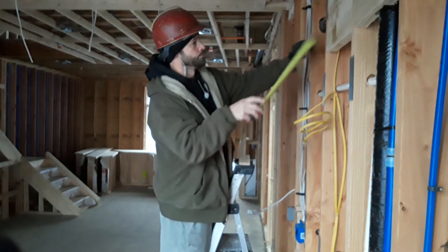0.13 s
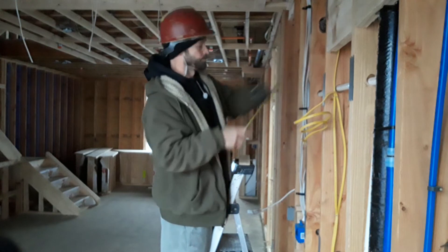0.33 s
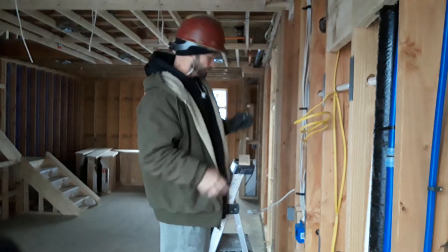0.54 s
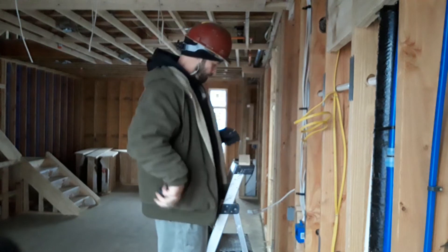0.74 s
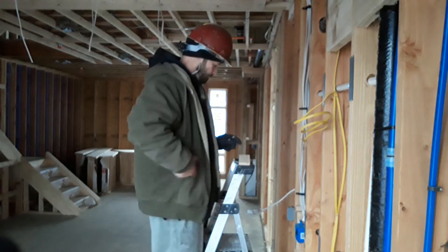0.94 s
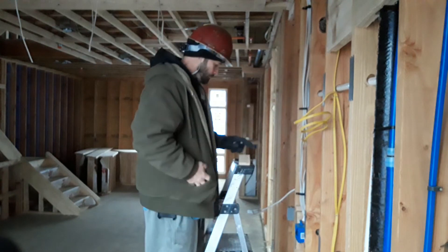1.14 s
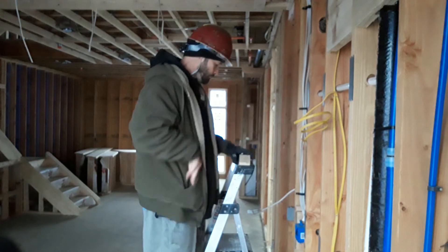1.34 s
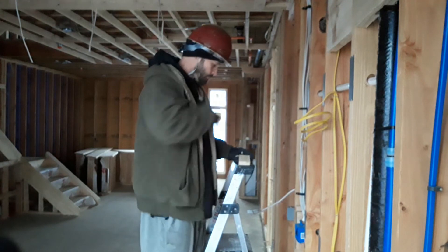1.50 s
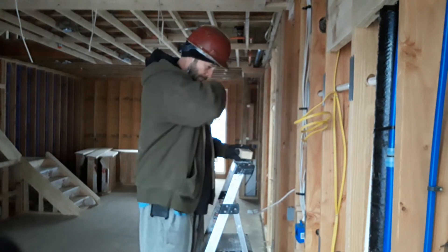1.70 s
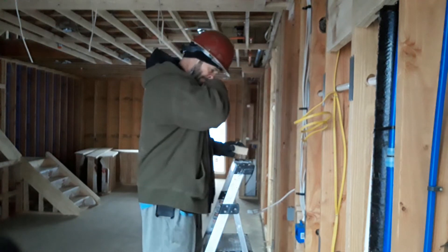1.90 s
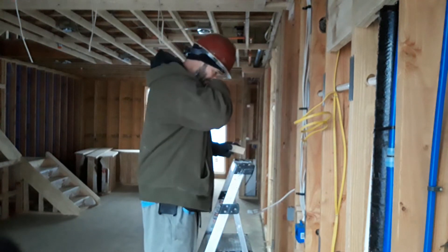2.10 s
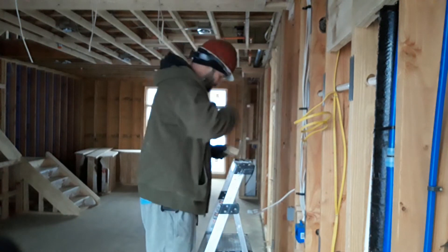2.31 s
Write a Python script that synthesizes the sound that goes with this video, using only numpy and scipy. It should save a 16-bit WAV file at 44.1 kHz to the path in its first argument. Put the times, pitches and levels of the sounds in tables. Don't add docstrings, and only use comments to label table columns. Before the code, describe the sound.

A steel tape measure retracts: gritty scraping starts near 0.05 s, stutters, then speeds up with blade slaps around 0.25 and 0.32 s, and a very loud, sharp snap at 0.49 s rings briefly through a bare timber hall. Quiet knocks come at 1.3-1.4, 1.6, 2.04 and faintly 2.3 s, with soft jacket rustle from 1.3 to 2 s. A distant generator drones low throughout; close stereo, muted treble.

```python
import sys
import numpy as np
from scipy import signal
from scipy.fft import rfft, irfft
from scipy.io import wavfile
from scipy.ndimage import uniform_filter1d

SR = 44100
rng = np.random.default_rng(int(sys.argv[2]) if len(sys.argv) > 2 else 0)


def output_pcm(signal):
    pcm = np.clip(np.atleast_2d(signal).T, -1, 1) * 32767
    wavfile.write(sys.argv[1], SR, np.round(pcm).astype(np.int16))


def decibels_to_gain(level_db):
    exponent = np.asarray(level_db, float) / 20
    return 10 ** exponent


N = 103635
T = np.arange(N) / SR

# (time [s], level [dB])
SCRAPE_LEVEL = [
    (.04, -63.5),
    (.075, -42),
    (.125, -58),
    (.15, -39.5),
    (.22, -35),
    (.29, -39),
    (.33, -34),
    (.39, -39),
    (.484, -41),
]
# (frequency [Hz], gain [dB])
SCRAPE_TONE = [(250, -38), (500, -16), (1000, -16), (2300, -5.5), (3000, 2.5), (5000, -3.5), (7000, 0),
               (15000, 0.5)]
# (frequency [Hz], width [Hz], level [dB])
BLADE_MODES = [(2280, 350, -9), (3500, 350, -11), (5370, 690, 12), (7200, 520, 5)]
# (frequency [Hz], gain [dB])
SNAP_COLOUR = [(150, -47.5), (300, -15), (500, -7), (1500, -9), (2200, -2.5), (4000, -0.5), (6500, -1.5),
               (15000, -7.5)]
# (frequency [Hz], level [dB], decay t60 [s])
CASE_MODES = [(790, -9.5, 0.024), (2240, 1.5, 0.01), (2663, -4, 0.057), (3336, -5, 0.0067),
              (5310, -10, .015), (6630, -8.5, .015)]
# (time [s], peak [dB], pitch [Hz], width [Hz], length [s])
KNOCK_EVENTS = [(0.056, -37.5, 3800, 5290, 0.013), (0.101, -27.5, 900, 1000, 0.0032),
                (0.147, -35, 5320, 6000, 0.0068), (0.2471, -15, 4670, 3570, .009),
                (.2475, -22.5, 2080, 3050, 0.014), (0.324, -26, 2344, 2040, 0.022),
                (1.273, -45, 834, 700, .004), (1.355, -39.5, 253, 200, 0.025),
                (1.412, -37.5, 201, 200, 0.012), (1.589, -35, 4170, 5080, 0.0021),
                (1.5895, -37.5, 1100, 1400, .003), (1.5926, -31, 2400, 1500, 0.0027),
                (1.812, -46.5, 5800, 3530, 0.016), (2.037, -30.5, 753, 980, 0.0058),
                (2.047, -39.5, 2660, 610, .008), (2.293, -48.5, 4220, 4500, 0.0047)]
# (start [s], rise [s], fall [s], level [dB], brightness [dB per octave])
CLOTH_STROKES = [
    (1.26, .03, 0.13, -63.5, 4.5),
    (1.33, 0.047, 0.053, -64, -6),
    (1.6, 0.024, .1, -61, 3),
    (1.8, 0.13, 0.18, -58.5, 2),
    (1.92, .16, 0.072, -52, 0),
]
# (frequency [Hz], gain [dB])
CLOTH_TONE = [(500, -31.5), (1500, -4), (3000, -2.5), (4500, -8), (5300, -1.5), (7000, -1), (10000, -2),
              (15000, -7.5)]
# (frequency [Hz], decay t60 [s])
HALL_DECAY = [(350, 0.57), (700, 0.64), (1400, 0.51), (2800, 0.44), (5600, 0.34), (11000, 0.28)]
# (frequency [Hz], left minus right before
# scaling [dB])
PORT_BALANCE = [(300, -4), (700, -1.5), (1300, 5.5), (2300, 5.5), (4400, 0), (7000, -5.5), (10000, -7.5),
                (15000, -1.5)]
# (time [s], level [dB])
DRONE_LEVEL = [(0.0, -43), (0.34, -38.5), (0.44, -39), (0.69, -44.5), (1.02, -49), (1.8, -45),
               (1.98, -41.5), (2.35, -42.5)]
# (order of the cycle [multiple], level [dB])
GENERATOR_ORDERS = [(9, -13), (10, -2.5), (12, -3.5), (14, -10), (15, -3), (18, -12), (20, -9), (31, -16.5)]
# (frequency [Hz], gain [dB])
AIR_TONE = [(25, -34.5), (127, -6), (270, -15.5), (476, -19), (1840, -27.5), (2900, -31), (3800, -39),
            (15000, -49.5)]
# (frequency [Hz], likeness [0-1])
AIR_LIKENESS = [(60, 0.96), (130, 0.6), (290, 0.1), (640, 0.05)]
# (frequency [Hz], gain [dB])
MIC_TONE = [(3000, 1), (7100, 0.5), (7900, -10.5), (8700, -21), (10400, -9), (13000, -14.5), (15200, -9),
            (16000, -14)]

BLADE_DB, SCRAPE_DB = -11, 0
GRIT_PER_S, GRIT_SPREAD_DB = 9500, 2.5
SNAP_S, SNAP_DB, SNAP_RING_DB = .4853, 2.5, -15.5
RATTLE_S, RATTLE_DB = .012, -2.5
CONTACT_DB = 10
KNOCK_WET_DB = -7.5
ZIP_HZ, ZIP_WIDTH_HZ, ZIP_DB = 4910, 90, 11.5
HALL_DB, HALL_BUILD_S = 3.5, 0.001
PORT_LAG_S = .00044
GENERATOR_HZ, WAVER, ORDER_SWAY_DB = 13.0, 0.0018, 1.5
AIR_DB, FLICKER_DB = -1.5, -0.5
TOP_HZ, BOTTOM_HZ = 16000, 45
CEILING = 1.7


def curve(table, x, log=False):
    a = np.array(table, float)
    if log:
        return np.interp(np.log(x + 1), np.log(a[:, 0] + 1), a[:, 1])
    return np.interp(x, a[:, 0], a[:, 1])


def unit(x):
    return x / np.sqrt(np.mean(x ** 2))


def colour(x, table, share=1, tilt_db=0):
    size = 4096
    hz = np.arange(size // 2 + 1) * SR / size
    gain_db = share * curve(table, hz, True) + tilt_db * np.log2(hz / 4000 + .1)
    cepstrum = irfft(gain_db * np.log(10) / 20)
    cepstrum[1:size // 2] *= 2
    cepstrum[size // 2 + 1:] = 0
    impulse = irfft(np.exp(rfft(cepstrum)))
    return signal.fftconvolve(x, np.atleast_2d(impulse), axes=-1)[..., :x.shape[-1]]


def ring(x, hz, width_hz):
    b, a = signal.iirpeak(hz, hz / max(width_hz, 1), SR)
    return signal.lfilter(b, a, x)


def walk(rate):
    k = int(SR / rate)
    steps = np.repeat(rng.standard_normal(N // k + 1), k)
    smooth = uniform_filter1d(uniform_filter1d(steps, k), k)
    return unit(smooth[:N])


def grit(per_s, spread_db):
    chance, sign, size = rng.random((3, N))
    clicks = (chance < per_s / SR) * np.sign(sign - .5)
    return unit(clicks * decibels_to_gain(-spread_db * np.log(size + 1e-4)))


def burst(start, length):
    return (T >= start) * np.exp(-np.clip(T - start, 0, None) / max(length, 2e-4))


def slide():
    friction = grit(GRIT_PER_S, GRIT_SPREAD_DB)
    scrape = unit(colour(friction[None], SCRAPE_TONE)[0])
    blade = unit(sum(decibels_to_gain(db) * ring(friction, hz, width) for hz, width, db in BLADE_MODES))
    level = decibels_to_gain(SCRAPE_DB + curve(SCRAPE_LEVEL, T) + 0.61 * walk(43))
    moving = (T > SCRAPE_LEVEL[0][0]) * (T < SNAP_S)
    return (scrape + decibels_to_gain(BLADE_DB) * blade) * level * moving


def snap():
    blow = decibels_to_gain(RATTLE_DB) * grit(9000, 2.4) * burst(SNAP_S, RATTLE_S) / 2
    hit = int(SNAP_S * SR)
    blow[hit:hit + 3] = -1.0
    modes = 0
    for hz, db, t60 in CASE_MODES:
        modes = modes + decibels_to_gain(db) * ring(blow, hz, 3 / t60) * (t60 * 1000) ** .5
    return decibels_to_gain(SNAP_DB) * (colour(blow[None], SNAP_COLOUR)[0] + decibels_to_gain(SNAP_RING_DB) * modes)


def knocks():
    noise, out = rng.standard_normal(N), 0
    for start, db, hz, width, length in KNOCK_EVENTS:
        push = noise * burst(start, length)
        push[int(start * SR)] = decibels_to_gain(CONTACT_DB) * (SR / 20 / width) ** .5
        body = ring(ring(push, hz, width), hz, width)
        out = out + decibels_to_gain(db) * body * (SR / 4 / width) ** .5 * 0.8
    return out


def jacket():
    fibres, cloth = grit(10000, 1.8)[None], 0
    for start, rise, fall, db, tilt_db in CLOTH_STROKES:
        peak = start + rise
        swell = np.clip((T - start) / rise, 0, 1) ** 2
        fade = np.exp(-np.abs(T - peak) / fall * 2)
        shape = np.where(T < peak, swell, fade)
        cloth = cloth + decibels_to_gain(db) * shape * unit(colour(fibres, CLOTH_TONE, tilt_db=tilt_db)[0])
    zip_on = T > CLOTH_STROKES[3][0]
    zipper = decibels_to_gain(ZIP_DB) * zip_on * ring(cloth, ZIP_HZ, ZIP_WIDTH_HZ)
    return (cloth + zipper) * decibels_to_gain(1.57 * walk(30.63))


def hall(x):
    t, hz = T[:SR], np.arange(SR // 2 + 1)
    noise, tail = rfft(rng.standard_normal((2, SR))), 0
    for k, (_, t60) in enumerate(HALL_DECAY):
        band = curve([(f, j == k) for j, (f, _) in enumerate(HALL_DECAY)], hz, True)
        tail = tail + irfft(noise * band, SR) * decibels_to_gain(-60 * t / t60)
    tail = tail * (1 - np.exp(-t / HALL_BUILD_S))
    tail = decibels_to_gain(HALL_DB) * tail / np.sqrt(np.sum(tail ** 2) / 2)
    return signal.fftconvolve(x[None], tail, axes=-1)[:, :N]


def drone():
    hz = np.arange(N // 2 + 1) * SR / N
    alike = np.clip(curve(AIR_LIKENESS, hz, True), 0, 1)
    mid, side = rfft(rng.standard_normal((2, N)))
    spread = np.sqrt(1 - alike) * side * np.array([[1], [-1]])
    noise = irfft(np.sqrt(1 + alike) * mid + spread, N)
    air = decibels_to_gain(AIR_DB + FLICKER_DB * walk(11.9)) * unit(colour(noise, AIR_TONE))

    cycle = 2 * np.pi * np.cumsum(GENERATOR_HZ * (1 + WAVER * walk(1.95))) / SR
    count = len(GENERATOR_ORDERS)
    phases = 2 * np.pi * rng.random((count, 1, 1))
    phases = phases + 0.24 * rng.standard_normal((count, 2, 1))
    hum = 0
    for (order, db), phase in zip(GENERATOR_ORDERS, phases):
        hum = hum + decibels_to_gain(db + ORDER_SWAY_DB * walk(4.95)) * np.sin(order * cycle + phase)
    return (air + 0.69 * hum) * decibels_to_gain(curve(DRONE_LEVEL, T))


def scene():
    taps = knocks()
    rest = slide() + snap() + jacket()
    near = taps + rest
    direct = np.array([np.roll(near, int(PORT_LAG_S * SR)), near])
    both = direct + hall(rest + decibels_to_gain(KNOCK_WET_DB) * taps)
    left = colour(both[:1], PORT_BALANCE, share=0.73)[0]
    right = colour(both[1:], PORT_BALANCE, share=-0.75)[0]
    return np.array([left, right]) + drone()


def band_limit(x):
    return signal.sosfilt(signal.butter(12, 16980, fs=SR, output="sos"), x)


def record(dry):
    low_cut = signal.butter(2, BOTTOM_HZ, "high", fs=SR, output="sos")
    high_cut = signal.ellip(10, .2, 50, TOP_HZ, fs=SR, output="sos")
    x = signal.sosfilt(low_cut, colour(dry, MIC_TONE))
    x = signal.sosfilt(high_cut, x)
    x = x * np.clip((T[-1] - T) * 500, 0, 1)
    mix = CEILING * np.tanh(x / CEILING)
    return band_limit(mix)


dry = scene()
out = record(dry)
output_pcm(out)
```